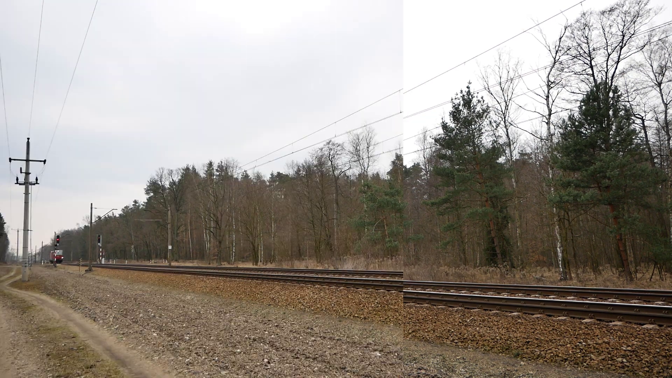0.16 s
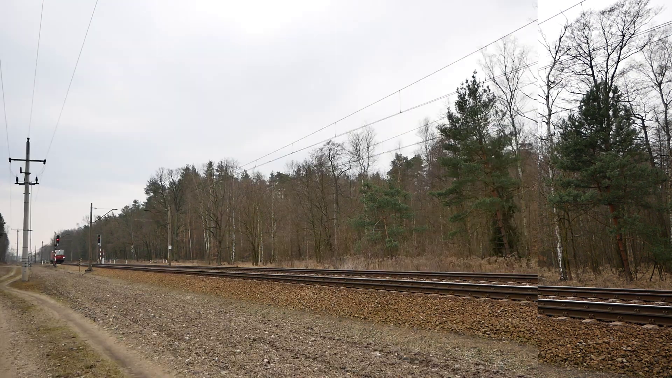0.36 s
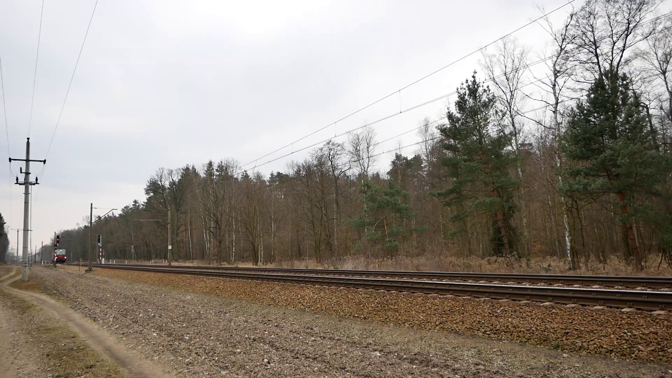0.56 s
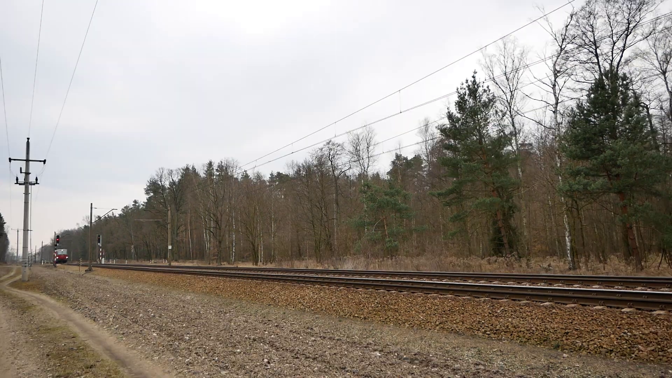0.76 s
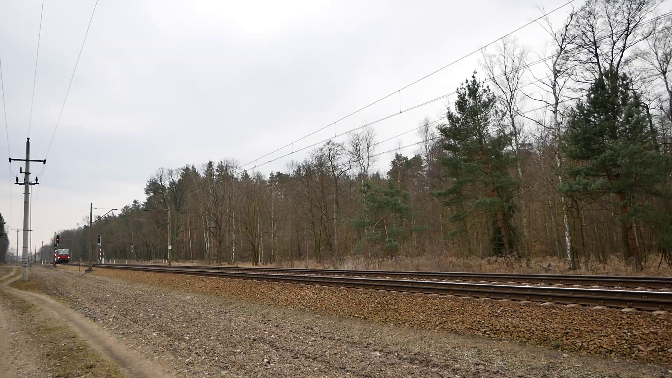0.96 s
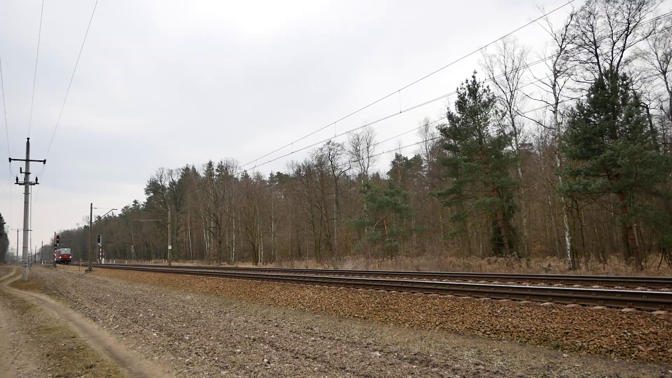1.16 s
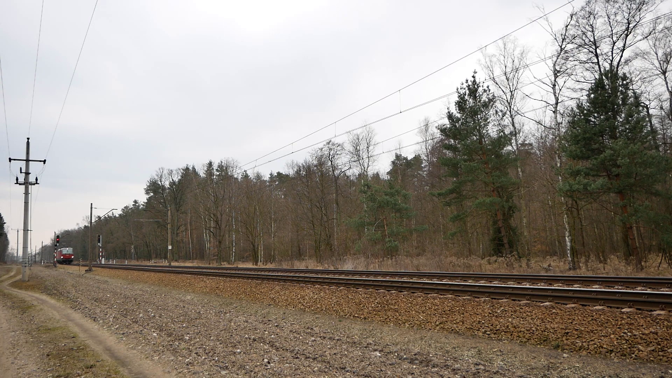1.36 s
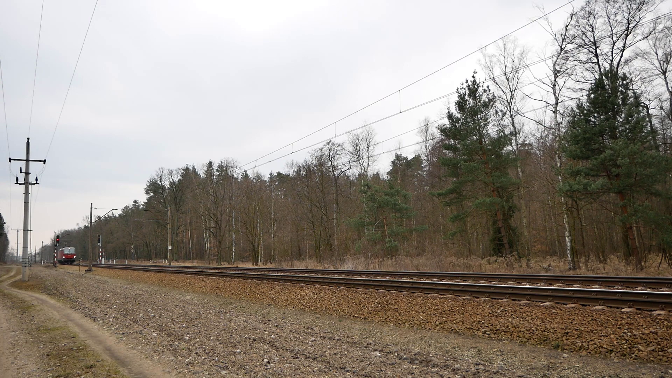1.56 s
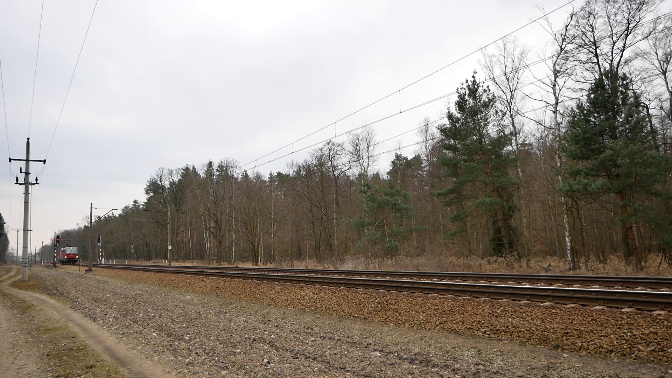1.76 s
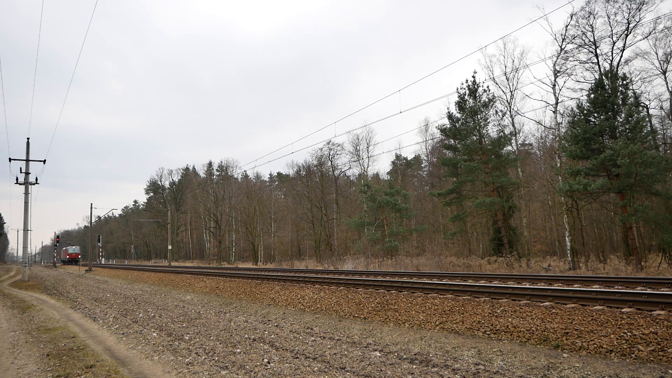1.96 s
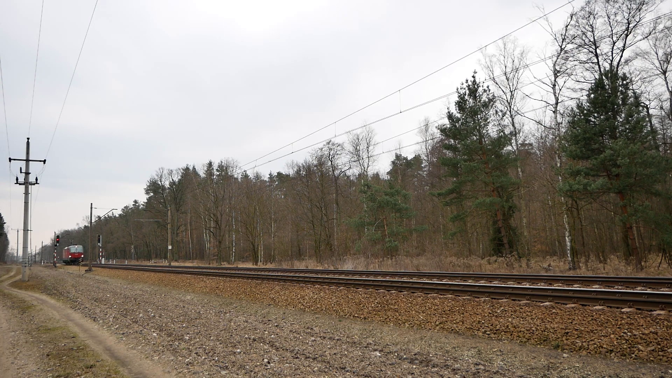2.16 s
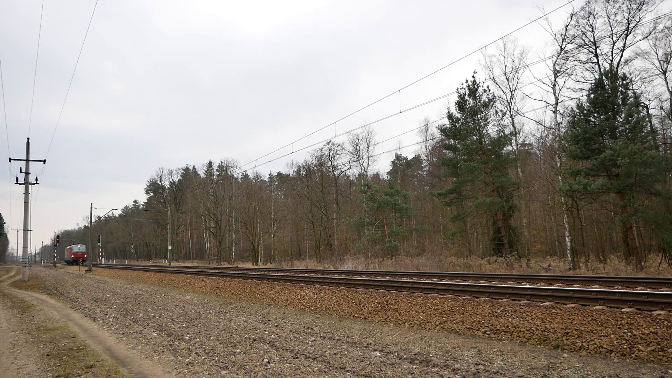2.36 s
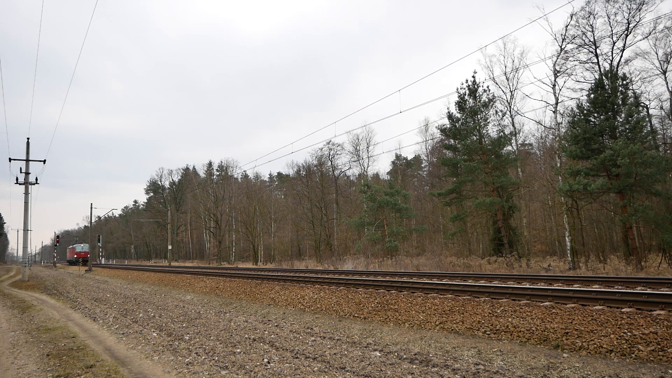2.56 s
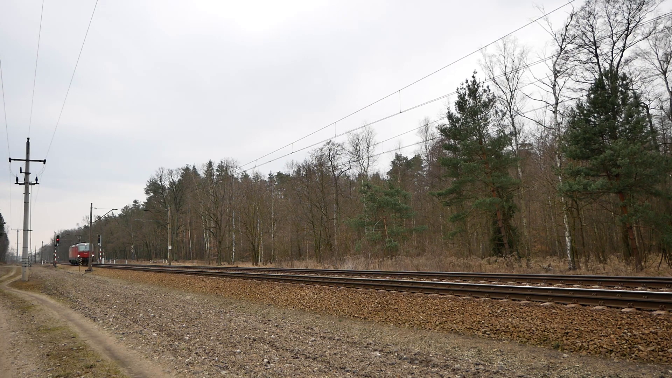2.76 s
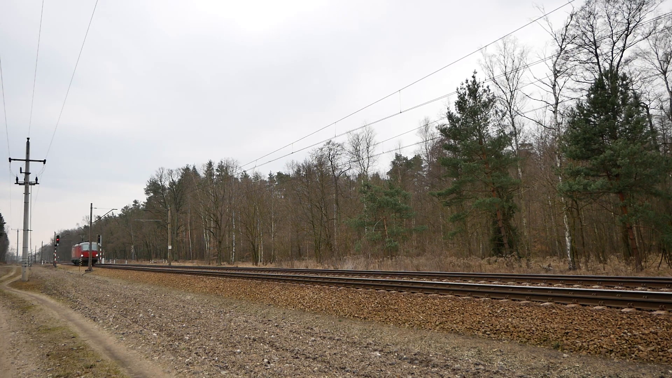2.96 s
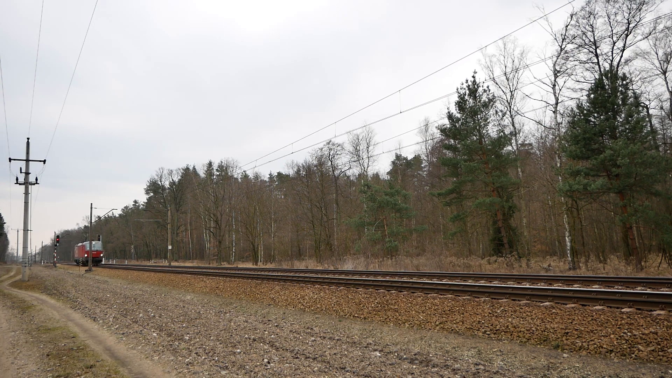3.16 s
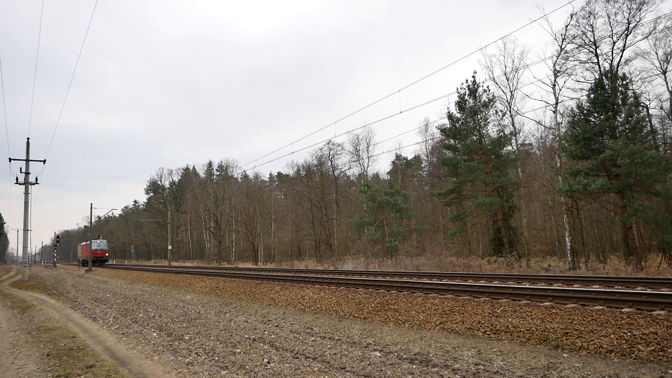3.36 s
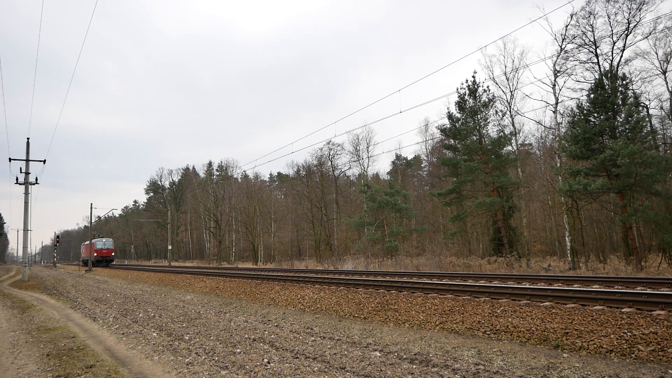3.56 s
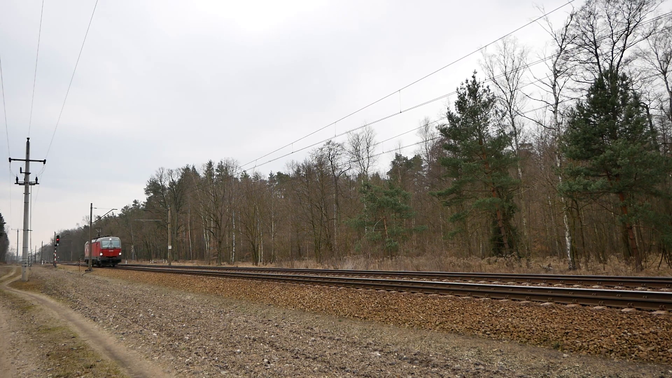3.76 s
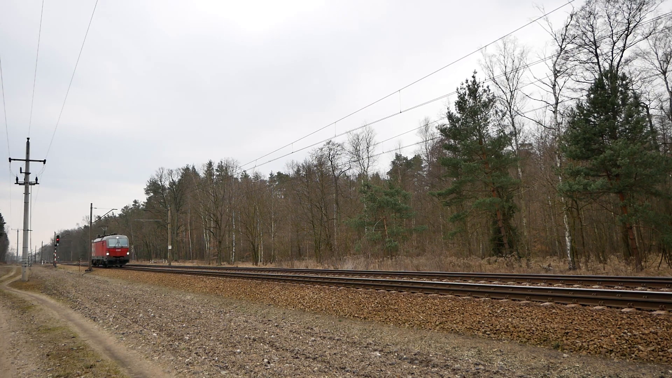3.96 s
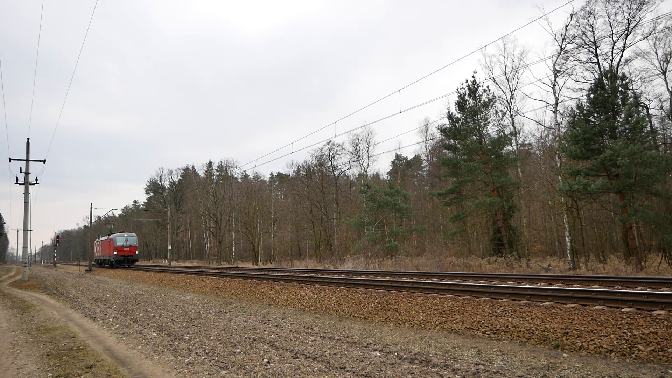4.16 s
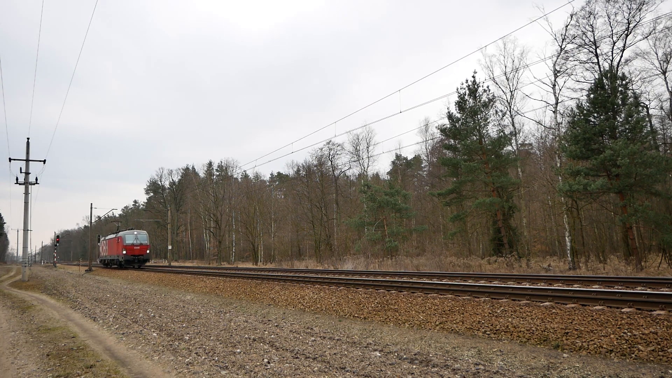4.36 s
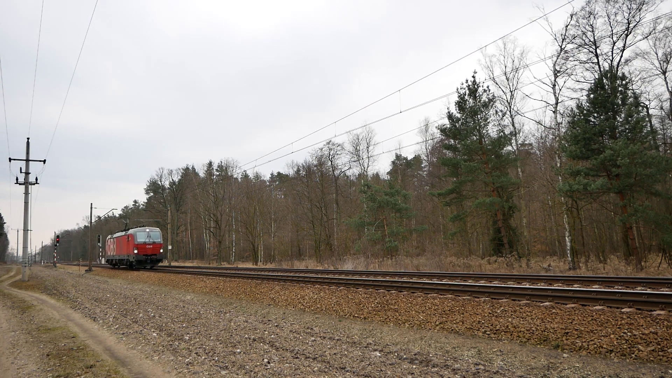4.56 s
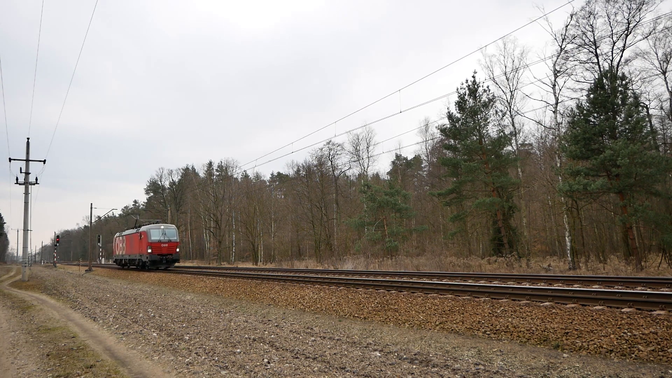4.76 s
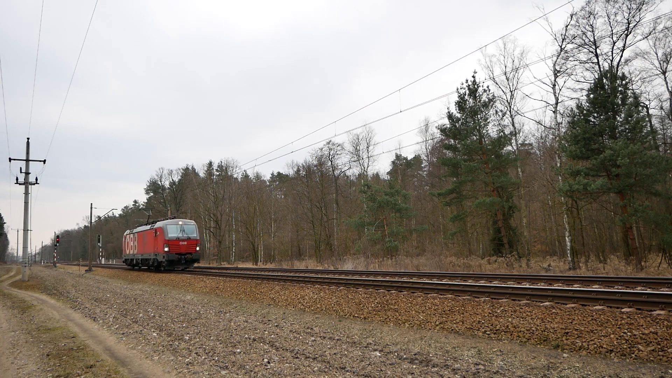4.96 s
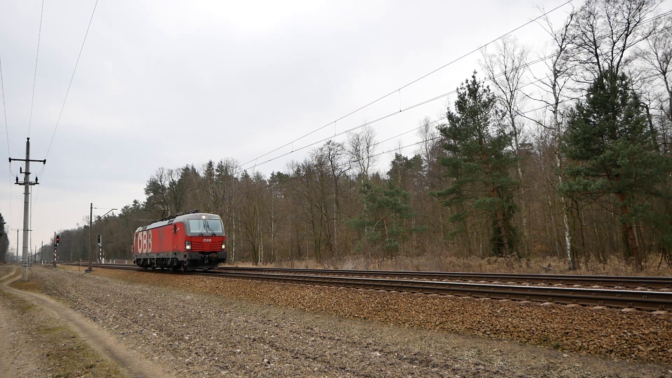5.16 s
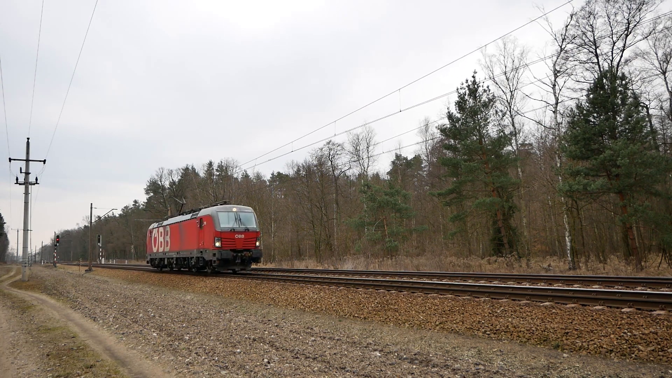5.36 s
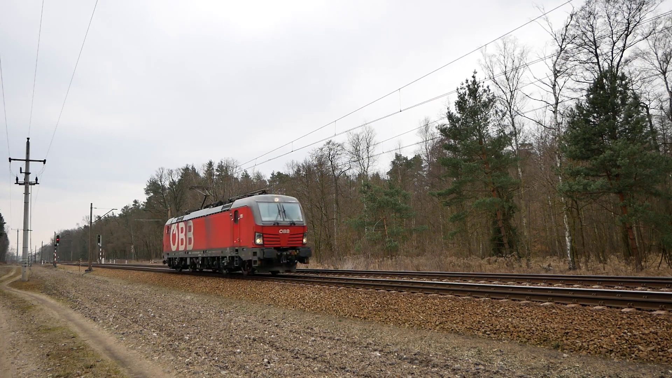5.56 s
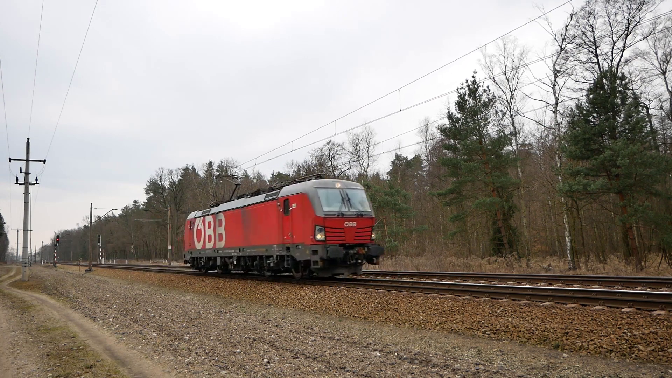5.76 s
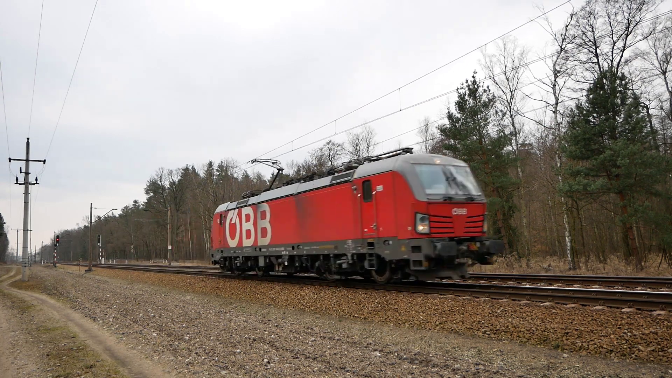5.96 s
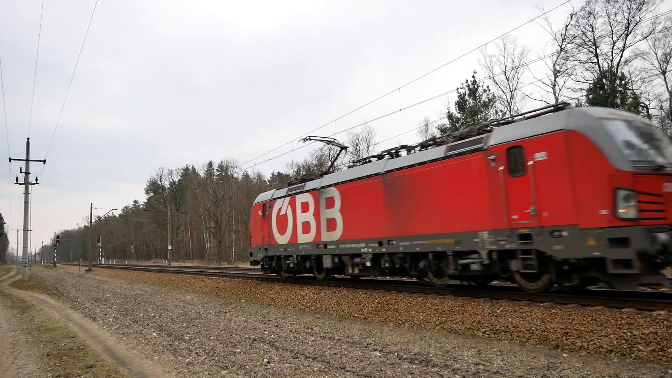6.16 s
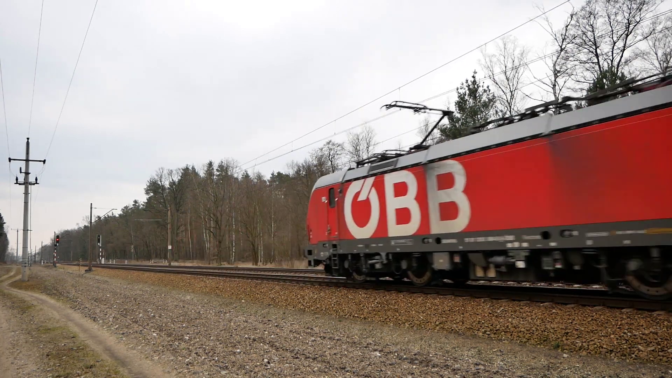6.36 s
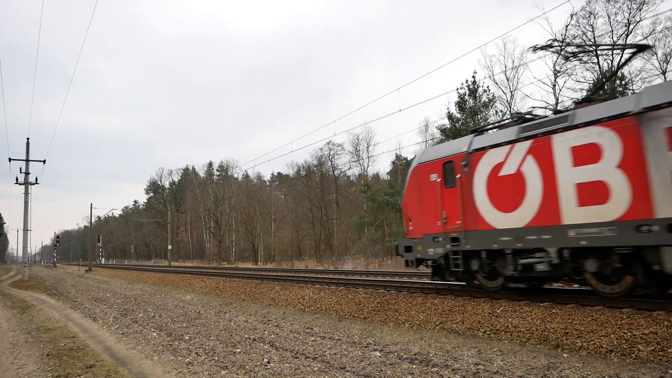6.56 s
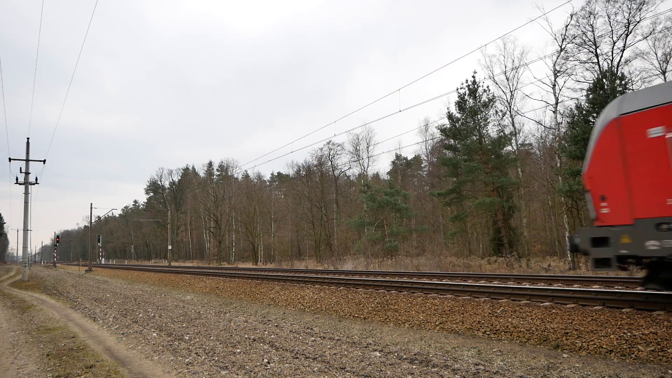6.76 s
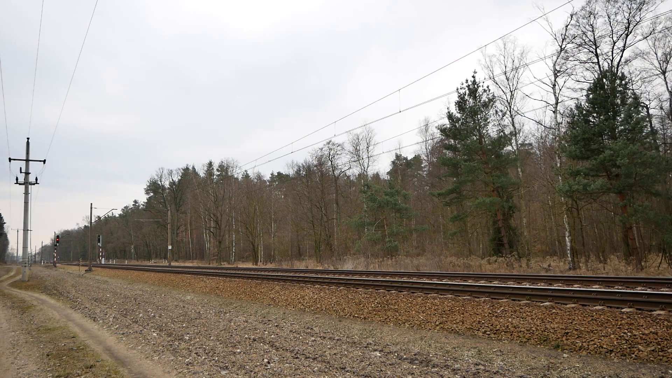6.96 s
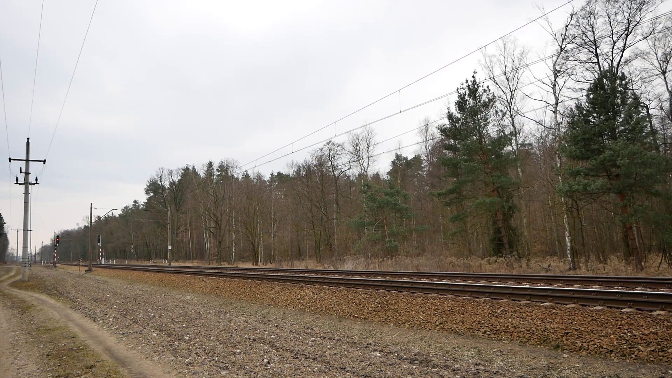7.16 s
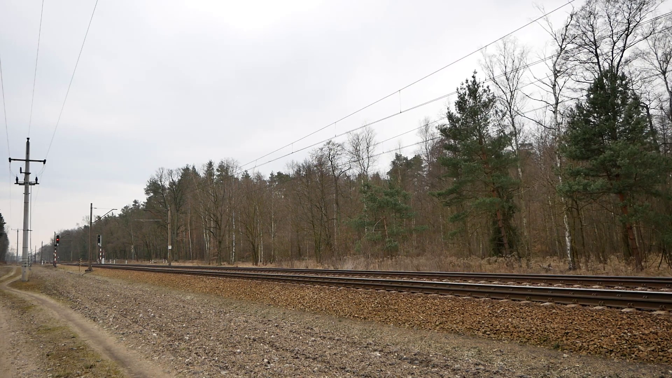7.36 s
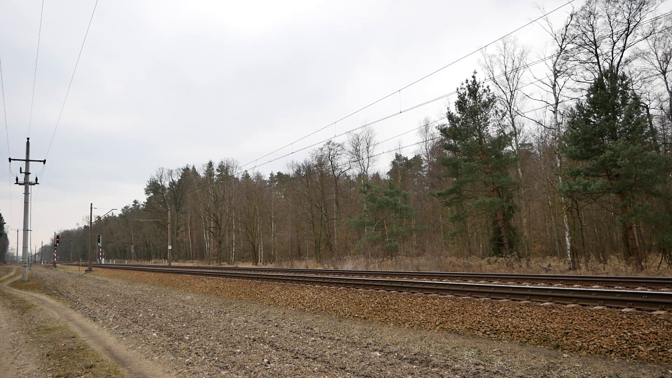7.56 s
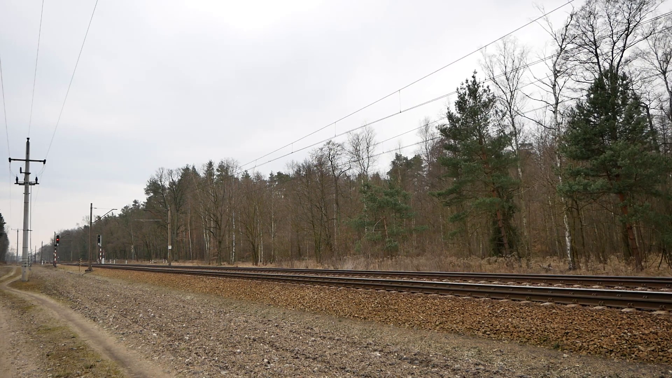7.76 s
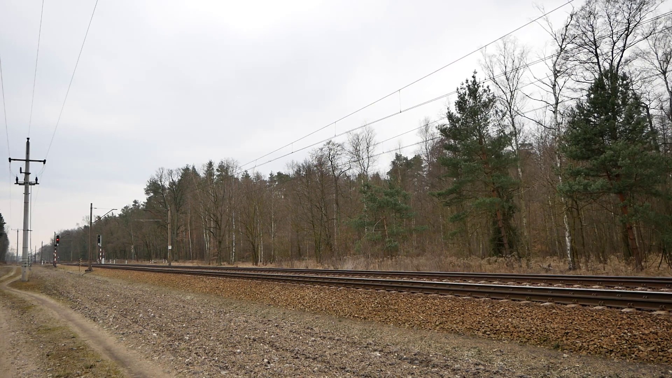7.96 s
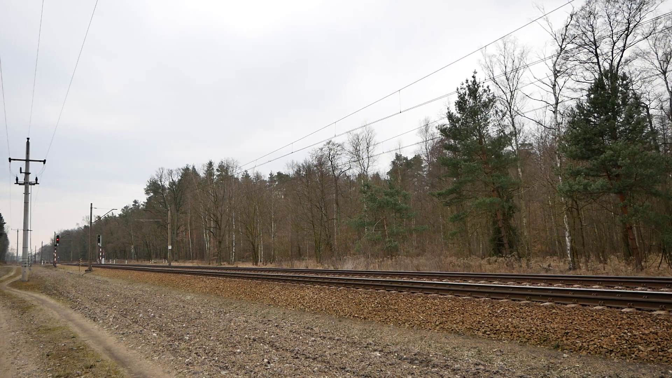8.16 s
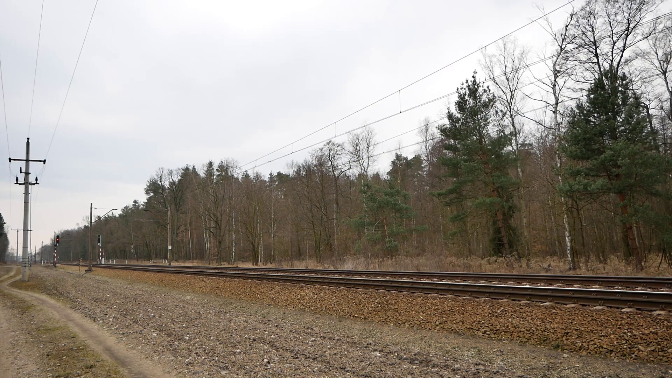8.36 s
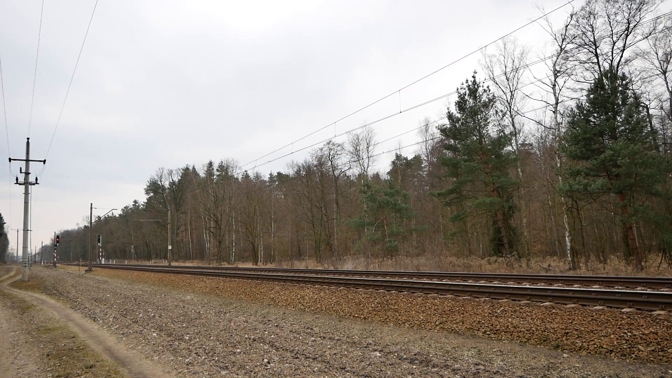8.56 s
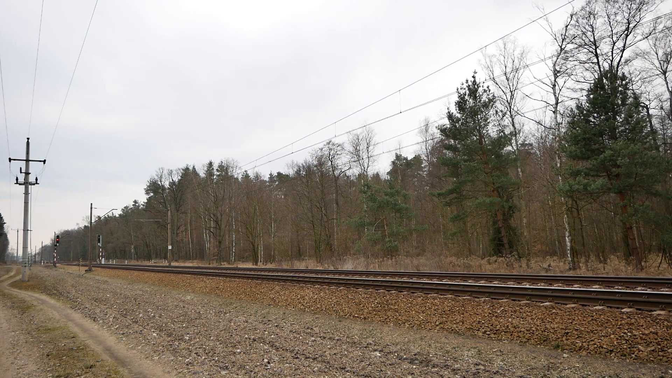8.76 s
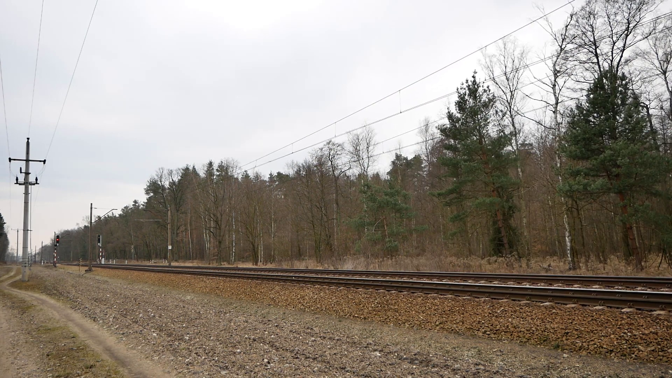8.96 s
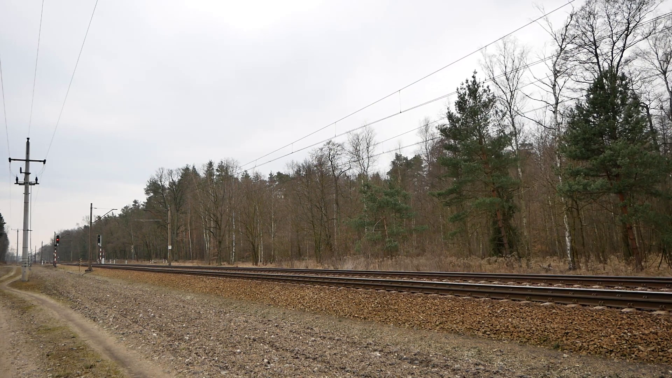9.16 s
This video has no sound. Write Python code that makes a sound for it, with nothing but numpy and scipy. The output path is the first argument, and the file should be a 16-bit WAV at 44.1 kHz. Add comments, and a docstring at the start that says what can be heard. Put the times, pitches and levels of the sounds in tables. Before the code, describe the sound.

A single fast locomotive approaches over hissing, singing rails, sweeps past with a deep roar and rattling wheels, then fades into ringing steel.

```python
"""Beside a forest track, a lone electric locomotive comes fast towards the listener and passes a few metres away.
The rails sing in one narrow band of filtered noise, with a thin sizzle on top and throbs in short bursts.
Coloured noises make the body rumble, the wheels roar and rasp, the air rush by and the bogies clatter.
A wheel squeals briefly in wavering sines; after the pass the overhead wire pings in fading sines and
twangs in falling sweeps."""
import sys
import numpy as np
from scipy import signal
from scipy.fft import rfft, irfft, next_fast_len
from scipy.io import wavfile
from scipy.ndimage import uniform_filter1d, map_coordinates

SR = 44100
rng = np.random.default_rng(int(sys.argv[2]) if len(sys.argv) > 2 else 0)


def persist_wave(psi):
    """Save psi, clipped to +-1, as 16-bit WAV."""
    counts = np.round(np.clip(psi, -1, 1) * 32767).astype(np.int16)
    wavfile.write(sys.argv[1], SR, np.atleast_2d(counts).T)


N = 406602
T = np.arange(N) / SR  # time in s
HZ = np.maximum(np.fft.rfftfreq(next_fast_len(N, True), 1 / SR), 1)  # frequency of each filter step

# wheels rolling on the rails, before trims: t/s, low roar/dB, high rasp/dB
ROLLING_LEVELS = [(0.08, -42, -49.5), (0.15, -37.5, -46), (0.7, -37, -46), (1.8, -43, -45),
                  (2.08, -45, -43), (2.25, -40.5, -40), (2.65, -36.5, -41), (3.15, -39, -40.5),
                  (3.35, -37.5, -37.5), (3.9, -30.5, -35), (4.6, -32, -34.5), (5.4, -26, -31.5),
                  (5.72, -23.5, -29), (5.95, -24.5, -32), (6.3, -21, -30), (6.96, -21, -28.5),
                  (7.08, -23.5, -31), (7.17, -23.5, -30.5), (7.45, -26, -34), (7.75, -36.5, -39.5),
                  (9.22, -36.5, -40.5)]


def undb(db):
    """Turn decibels into a gain."""
    return 10 ** (np.asarray(db) / 20)


def unit(x):
    """Scale to an rms (average strength) of 1."""
    return x / np.sqrt(np.mean(x ** 2))


def curves(table):
    """Join each column of a table by straight lines in time."""
    s, *columns = np.transpose(table)
    return [np.interp(T, s, column) for column in columns]


def colour(x, points):
    """Filter by a spectrum given as points of f/Hz, level/dB."""
    hz, db = np.transpose(points)
    size = next_fast_len(N, True)
    gain = undb(np.interp(np.log(HZ), np.log(hz), db))
    return irfft(rfft(x, size) * gain, size)[:N]


def noise(points):
    """Coloured noise of rms 1."""
    return unit(colour(rng.standard_normal(N), points))


def walk(rate):
    """Random levels, a new one every 1 / rate s, smoothed twice; their spread is near 1."""
    k = max(int(SR / rate), 2)
    steps = np.repeat(rng.standard_normal(N // k + 1), k)
    smooth = uniform_filter1d(uniform_filter1d(steps, k), k)
    return 1.35 * smooth[:N]


def flutter(rate, depth_db):
    """A wavering gain of rms 1."""
    return unit(undb(depth_db * walk(rate)))


def blend(far, near, nearness):
    """Noise whose colour changes as the locomotive comes close."""
    return np.sqrt(1 - nearness) * noise(far) + np.sqrt(nearness) * noise(near)


def add(out, s, sound):
    """Mix a short sound in at time s."""
    i = int(s * SR)
    out[i:i + len(sound)] += sound[:max(N - i, 0)]


def bursts(table, rise):
    """Envelope of bursts that start fast, hold and die; the table gives t/s, level/dB, length/s."""
    out, age = np.zeros(N), T[:SR // 4]
    for s, db, length in table:
        attack = 1 - np.exp(-age / rise)
        decay = np.exp(-(age / length) ** 2 / 2)
        add(out, s, undb(db) * attack * decay)
    return out


def dips(table, rise):
    """A gain of 1 that loses a share of itself for short moments."""
    losses = [(s, 20 * np.log10(lost), length) for s, lost, length in table]
    return 1 - bursts(losses, rise)


def above(x, edge_hz, order=10):
    """Steep high-pass with a moving edge."""
    hz, s, z = signal.stft(x, SR, nperseg=2 ** 10)
    ratio = (hz[:, None] / np.interp(s, T, edge_hz)) ** order
    passed = z * ratio / np.sqrt(1 + ratio ** 2)
    return signal.istft(passed, SR, nperseg=2 ** 10)[1][:N]


def even(x):
    """Noise of rms 1 that keeps its grain but loses its slow chance swells."""
    size = SR // 25
    return x / np.sqrt(uniform_filter1d(x ** 2, size))


def resonance(hz, band=((8, 4), (25, -9), (80, -32), (400, -70))):
    """Noise around a steady or moving centre; the band lists distance from the centre/Hz, level/dB."""
    phase = 2 * np.pi * np.cumsum(hz + np.zeros(N)) / SR
    return (noise(band) * np.cos(phase) + noise(band) * np.sin(phase)) / np.sqrt(2)


def doppler(x, closest_s, sweep_s, mach):
    """Raise the pitch on the way in and lower it on the way out, by playing faster, then slower."""
    along = (T - closest_s) / sweep_s
    speed = 1 / (1 + mach * along / np.sqrt(1 + along ** 2))
    return map_coordinates(x, [np.cumsum(speed)], order=3, mode="wrap")


def rail_song(nearness):
    """Wheels strike the rough rail head unevenly; the rail passes one band of bending waves, with strands."""
    # singing of the rails, before trims: t/s, level/dB
    song_levels = [(0.0, -34.5), (1.72, -34.5), (1.82, -24.5), (2.49, -24), (2.9, -26), (3.29, -17),
                   (3.5, -18.5), (3.8, -19), (3.98, -17), (4.88, -19), (5.3, -18.5), (5.8, -22),
                   (6.15, -22.5), (6.65, -24.5), (7.15, -32.5), (7.45, -33), (7.58, -29), (7.63, -37),
                   (7.83, -28.5), (7.98, -30.5), (8.48, -26.5), (8.65, -27), (8.81, -25), (9.01, -33.5),
                   (9.22, -26.5)]
    # the rails carry their lower notes only a short way: t/s, lower edge of the song/Hz
    song_edge = [(0, 967), (1.8, 1110), (3.5, 1060), (4.3, 940), (5.2, 780), (6, 710), (7, 721), (7.7, 686),
                 (8.4, 816), (9.2, 910)]
    # spectrum of the song: f/Hz, level per Hz/dB
    song_colour = [(400, -21), (700, 5.5), (760, 1.5), (830, 8), (900, 2), (980, 9.5), (1075, 3.5),
                   (1170, 3.5), (1270, 3), (1330, 3), (1405, 3), (1450, -17), (1520, -19), (2000, -62)]
    # bursts in the rails: t/s, level/dB, length/s
    throbs = [(1.776, -16, 0.0085), (1.819, -15, 0.01), (1.924, -14, 0.0078), (1.968, -22, .01),
              (1.998, -13, .007), (2.015, -15, 0.013), (2.057, -15, 0.041), (2.116, -18, .011),
              (2.16, -19.5, 0.03), (2.321, -17.5, 0.018), (2.373, -12, 0.012), (2.432, -15, 0.024),
              (3.4, -10.5, .02), (3.598, -9, 0.0087), (3.631, -10.5, 0.014), (3.678, -11.5, .025),
              (4.06, -16, .02), (4.124, -10.5, 0.011), (4.222, -19, 0.011), (4.275, -12, 0.022),
              (4.465, -16, .02), (4.83, -14, .025), (4.99, -16, 0.028), (5.138, -12, .012),
              (7.535, -17, 0.0069), (7.552, -11.5, 0.011), (7.574, -16.5, .013), (7.708, -18.5, 0.02),
              (7.804, -17.5, 0.017), (7.89, -21, .014), (8.189, -11.5, 0.0092), (8.212, -24, 0.0083),
              (8.364, -18, 0.0093), (8.397, -20, 0.021), (8.44, -20, 0.011), (8.474, -16.5, 0.023),
              (8.708, -18, 0.022), (8.755, -20.5, .014), (8.81, -13.5, 0.0097)]
    # the song drops away for a moment: t/s, share lost, length/s
    lulls = [(1.787, .75, .008), (1.805, .7, .007), (2.03, .65, .016), (2.135, .7, .014), (2.3, .4, .012),
             (2.352, .65, .011), (3.042, .6, .015), (3.162, .6, .018), (3.718, .55, .009),
             (3.882, .7, .016), (4.355, .65, .022)]
    # narrow strands that stand out of the song: f/Hz, relative level/dB
    strand_notes = [(955, -2.5), (1004, -3), (1075, 1.5), (1135, -1.5), (1205, -4.5), (1275, -9.5),
                    (1375, -8)]
    # the strands sharpen as the locomotive nears: t/s, level against the steady song/dB
    strand_levels = [(1.2, -16), (2.5, -7), (4, -5.5), (9.22, -7)]

    song_db, = curves(song_levels)
    edge_hz, = curves(song_edge)
    strand_db, = curves(strand_levels)
    # close by, many waves overlap and even out
    uneven_db = np.interp(T, [3, 4.5, 7.2, 7.6], [1.4, .75, .64, .9])
    contact = rng.standard_normal(N) * flutter(rate=190, depth_db=uneven_db)

    trim_db = 3 * (1 - nearness) + 1.5 * nearness - 1.17  # far off, then close by
    steady = undb(song_db + trim_db) * flutter(rate=20, depth_db=0.5)
    steady = steady * dips(lulls, rise=0.0028)
    drive = np.hypot(steady, bursts(throbs, rise=0.0019))

    strands = np.zeros(N)
    for hz, db in strand_notes:
        strand = resonance(hz * (1 + .005 * walk(5)))
        strands += undb(db) * strand * flutter(rate=14, depth_db=4)  # they come forward in turn
    broad_song = even(colour(contact, song_colour)) * drive
    return above(broad_song + undb(strand_db) * unit(strands) * steady, edge_hz)


def rail_sizzle():
    """High guided waves in the steel: steady in narrow bands, broader in spurts."""
    # treble waves running along the rails: t/s, level/dB
    sizzle_levels = [(0, -52), (.15, -65.5), (1.4, -64), (1.9, -55.5), (2.8, -56.5), (3.4, -50),
                     (4.2, -50.5), (5, -57), (6, -75), (7.7, -56), (7.95, -50), (8.55, -51), (8.8, -45),
                     (9, -47), (9.22, -43.5)]
    # spectra of the sizzle and of its spurts: f/Hz, level per Hz/dB
    sizzle_colour = [(5500, -13), (6800, -12.5), (7150, -0.5), (7500, -3.5), (7950, -29), (9200, -15),
                     (9550, -7.5), (9950, -17), (11200, -12), (12300, -16), (13400, -9), (15400, -37)]
    spurt_colour = [(3000, -12), (5500, -7), (7300, 0), (8100, -10), (9500, -6), (12000, -7), (13500, -13),
                    (15400, -30)]
    # sizzling spurts in the rails: t/s, level/dB, length/s
    spurts = [(6.96, -45, 0.041), (8.073, -38, 0.0093), (8.785, -38, 0.021), (8.895, -38.5, 0.019),
              (9.115, -38, 0.035)]

    sizzle_db, = curves(sizzle_levels)
    steady = undb(sizzle_db) * flutter(rate=81, depth_db=1.5)
    return noise(sizzle_colour) * steady + noise(spurt_colour) * bursts(spurts, rise=0.0033)


def locomotive(nearness):
    """Body rumble, wheel roar, the rasp of steel on steel and rushing air, each a coloured noise."""
    # rumble of the body: t/s, level/dB
    rumble_levels = [(0.0, -37), (0.07, -67), (0.13, -34.5), (0.65, -33.5), (1.46, -43), (2.02, -45),
                     (2.15, -31.5), (2.27, -28), (2.45, -37.5), (2.6, -30.5), (2.8, -39), (3.16, -41),
                     (3.36, -25), (3.44, -25), (3.73, -28.5), (3.77, -23), (3.95, -23), (5.2, -20.5),
                     (5.7, -19.5), (6.2, -20.5), (6.4, -20), (6.91, -17), (7.12, -27), (7.37, -27.5),
                     (7.65, -44.5), (9.22, -46)]
    # rushing air: t/s, level/dB
    hiss_levels = [(0, -67.5), (1.4, -61.5), (2.3, -59), (3.1, -55), (3.9, -47), (4.6, -47), (5.4, -45),
                   (5.75, -42.5), (6.15, -43.5), (6.35, -39), (6.6, -40.5), (6.95, -41), (7.15, -44),
                   (7.45, -44.5), (7.72, -50), (8.2, -49), (9.22, -51)]
    # the rasp flares on rough stretches of rail: t/s, level/dB, length/s
    flares = [(4.04, -27.5, 0.062), (4.83, -37, .02), (5.05, -25, 0.048), (5.22, -30, .07),
              (5.62, -34, 0.097)]
    # spectra from very far, far and near: f/Hz, level per Hz/dB
    rumble_distant = [(20, -29), (50, -15), (85, -11), (115, -1), (145, 5), (190, -2.5), (225, -4),
                      (270, -11.5), (380, -41), (700, -68)]
    rumble_far = [(20, -37), (38, -40), (55, -8), (90, -1), (145, 3.5), (200, -3), (260, -9), (320, -8),
                  (390, -23.5), (700, -69)]
    rumble_near = [(20, -43), (38, -49), (55, -16), (90, -8.5), (135, -3.5), (175, 0.5), (250, -0.5),
                   (310, -10), (420, -17), (700, -76)]
    roar_far = [(150, -11.5), (260, -7), (420, -2.5), (520, -0.5), (700, 2), (830, 3), (1000, -6.5),
                (1500, -0.5), (2000, -42)]
    roar_near = [(150, -33), (320, -2.5), (440, -1.5), (515, 1.5), (580, 2.5), (700, 2), (850, -1.5),
                 (1100, -9.5), (1800, -62)]
    rasp_colour = [(900, -9), (1250, 5), (1450, 6), (1650, 3.5), (1850, .8), (2300, -4.3), (3200, -9.3),
                   (3600, -11.5), (4200, -17.5), (6000, -32)]
    hiss_far = [(2500, 6.5), (4000, -9), (5000, 8), (6500, 7), (8300, 1.5), (11000, -28), (14000, -12),
                (15300, -20)]
    hiss_near = [(2500, -23), (4000, 3.5), (5000, 7), (6500, 4), (7500, 4.5), (8800, 2.5), (9900, -6),
                 (11500, -14), (14000, -26), (15300, -32)]

    rumble_db, = curves(rumble_levels)
    roar_db, rasp_db = curves(ROLLING_LEVELS)
    hiss_db, = curves(hiss_levels)
    # the bogies jolt the body and the wheels, harder when close
    jolts = flutter(rate=34, depth_db=.7 * np.sqrt(nearness))

    # from far off only one hollow band of the rumble arrives
    distant = np.interp(T, [2.55, 3.1], [1, 0])
    body = np.sqrt(distant) * noise(rumble_distant)
    body += np.sqrt(1 - distant) * blend(rumble_far, rumble_near, nearness)
    rumble = body * undb(rumble_db)

    roar = blend(roar_far, roar_near, nearness) * undb(roar_db + 3.5 - 3.75 * nearness)

    rasp = doppler(noise(rasp_colour), closest_s=6.4, sweep_s=.4, mach=.09)
    rasp = rasp * np.hypot(undb(rasp_db + 3.5), bursts(flares, rise=0.0084))
    rasp = rasp * flutter(rate=180, depth_db=0.72)

    hiss = blend(hiss_far, hiss_near, nearness) * undb(hiss_db) * flutter(rate=250, depth_db=0.5)
    return jolts * (rumble + roar + rasp + hiss)


def track_ring():
    """Rails and sleepers hum in narrow resonances that follow the level of the wheel roar."""
    # narrow resonances driven by the rolling wheels: f/Hz, level/dB
    track_modes = [(514, 3.5), (690, -16), (1068, -1.5)]

    roar_db = curves(ROLLING_LEVELS)[0]
    share_db = np.interp(T, [5, 6.5, 7.6, 9.22], [-21, -13, -7.5, -8.5])
    hum = sum(undb(db) * resonance(hz) for hz, db in track_modes)
    return hum * undb(roar_db + share_db)


def open_air():
    """A faint deep rumble of steady noise that stays throughout."""
    # spectrum of the deep rumble: f/Hz, level per Hz/dB
    air_colour = [(20, -22), (45, -17), (70, 8), (110, -4), (250, -1), (1000, -70)]
    return noise(air_colour) * undb(-50)


def ballast_ticks():
    """Sparse tiny ticks of fading noise, about 30 a second, a few much louder than the rest."""
    loudness = undb(4.0 * np.minimum(rng.exponential(size=N), 3))
    ticks = (rng.random(N) < 30 / SR) * loudness
    age = T[:SR // 100]
    grain = rng.standard_normal(len(age)) * np.exp(-age / 0.0013)
    ticks = signal.fftconvolve(ticks, grain)[:N]
    tick_sound = colour(ticks, [(2500, -20), (5000, -5), (7500, 5), (10000, -15), (15000, -12)])
    return unit(tick_sound) * undb(-71.0)


def wheel_ring():
    """A rough resonance that stumbles down in pitch as the wheels turn from coming to going."""
    # the wheels ring as they sweep past: t/s, ring before the stumble/Hz, level/dB
    ring_path = [(3.0, 1763, -64), (4.6, 1767, -45), (5.5, 1700, -31), (5.72, 1650, -25), (5.81, 1400, -19),
                 (5.86, 1200, -36), (5.91, 968, -23), (6.1, 900, -28), (6.9, 861, -33), (7.5, 829, -26.5),
                 (7.9, 813, -22.5), (8.3, 820, -44)]

    ring_hz, ring_db = curves(ring_path)
    stumble = 1 + .04 * walk(45)
    ring = resonance(ring_hz * stumble, [(60, -2.5), (130, -2), (400, -19), (1500, -70)])
    return ring * undb(ring_db) * flutter(rate=60, depth_db=2.0)


def roar_sweep():
    """A broad hump of wheel roar that sinks in pitch during the pass and surges as the wheels thud."""
    # the heart of the roar sinks as the locomotive draws level, then partly climbs: t/s, centre/Hz, level/dB
    hump_path = [(4.8, 1156, -45), (5.4, 1062, -26.5), (5.84, 932.5, -26), (6.0, 831, -22),
                 (6.15, 680, -23.5), (6.4, 528.2, -22), (6.5, 580.3, -35), (6.7, 681.7, -23.5),
                 (7.05, 738.4, -37), (7.7, 590, -62)]
    # the wheels thud over the nearby track and the roar surges: t/s, level/dB, length/s
    surges = [(5.888, -13.5, 0.026), (6.105, -15, 0.048), (6.27, -18, 0.034), (6.36, -19, .03),
              (6.595, -21, 0.033), (6.72, -18.5, 0.048), (6.92, -20, 0.045), (7.02, -24, .04),
              (7.07, -17, .02), (7.265, -20.5, 0.028)]

    centre_hz, sweep_db = curves(hump_path)
    hump = even(resonance(centre_hz, [(60, -3.0), (210, -1.0), (380, -8.0), (900, -37), (2000, -70)]))
    return hump * np.hypot(undb(sweep_db), bursts(surges, rise=0.0068))


def wheel_squeal():
    """A flange scrapes the rail and the wheel's modes waver and stutter."""
    # a wheel squeals briefly, before a trim: t/s, level/dB
    squeal_levels = [(5.9, -120), (5.94, -66), (5.965, -47), (6.01, -46), (6.04, -58), (6.08, -53),
                     (6.13, -52), (6.17, -66), (6.22, -120)]
    # the wheel's modes: f before wavering/Hz, relative level/dB
    wheel_modes = [(4479, -5.5), (5254, -2), (6180, -3.5), (8565, -1), (9458, -12), (10234, -17),
                   (11273, -17), (13975, -12)]

    squeal_db, = curves(squeal_levels)
    modes = np.zeros(N)
    for hz, db in wheel_modes:
        wavering_hz = hz * (1 + 0.003 * walk(400))
        tone = np.sin(2 * np.pi * np.cumsum(wavering_hz) / SR)
        modes += undb(db) * tone * flutter(rate=150, depth_db=3)
    return modes * undb(squeal_db + 2)


def bogie_clatter():
    """Each knock is a dull thud, a broad crack and a short metallic rattle around its own pitch."""
    # bogies clatter close by, before trims: t/s, level/dB, length/s, rattle centre f/Hz
    clatter_knocks = [(6.236, -29, .01, 1800), (6.342, -25, .016, 1650), (6.529, -25, .012, 2100),
                      (6.604, -29, .007, 1900), (6.633, -20.5, .01, 2300), (6.66, -30.5, .011, 3300),
                      (6.74, -26.5, .013, 2800), (6.947, -29, .01, 2000), (6.972, -21, .012, 1900),
                      (6.993, -27, .018, 2600), (7.058, -28, .01, 1600), (7.076, -21, .014, 2100),
                      (7.222, -31, .009, 2100), (7.278, -29, .014, 2400), (7.414, -32, .016, 2300)]
    # spectrum of the crack: f/Hz, level per Hz/dB
    crack_colour = [(500, -13), (1000, 5), (1900, 9), (3200, -3), (4000, -10), (8000, -17), (14000, -31)]
    # spectrum of the rattle: distance from its centre/Hz, level per Hz/dB
    rattle_band = [(100, 3), (300, -5), (700, -7), (2000, -45)]

    crack = noise(crack_colour) * flutter(rate=400, depth_db=3)
    thud_colour = [(60, -25), (180, -2), (400, -6), (750, 1), (1100, -5), (1800, -25), (4000, -60)]
    thud = even(noise(thud_colour))
    grain = even(noise(rattle_band))
    rattles = np.zeros(N)
    for s, db, length, hz in clatter_knocks:
        rattles += bursts([(s, db, length)], rise=0.002) * np.sin(2 * np.pi * hz * T)
    knocks = bursts([row[:3] for row in clatter_knocks], rise=.002)
    return (undb(-.5) * crack + undb(4) * thud) * knocks + undb(-2.5) * rattles * grain


def trailing_drone():
    """A low drone of narrow noise that swells as the locomotive leaves, then fades unevenly."""
    # low drone that trails the locomotive, before a trim: t/s, level/dB
    drone_levels = [(6.8, -57), (7.2, -26), (7.4, -29.5), (7.6, -37), (7.8, -44), (8.05, -35.5), (8.2, -55),
                    (9.22, -62)]

    drone_db, = curves(drone_levels)
    drone = noise([(30, -32), (70, -18), (105, 13.5), (145, 6), (190, -3), (500, -54)])
    return drone * undb(drone_db - 3.5)


def wire_pings():
    """The swinging wire knocks in its fittings and bounces once; each knock rings the same modes."""
    # pings of the overhead wire, before a trim: t/s, level/dB, pitch ratio
    ping_times = [(8.077, -31, 1.01), (8.358, -41, 1.03), (8.698, -35, 1.015), (8.803, -39, 1.012)]
    # modes of the wire: f before the pitch ratio/Hz, relative level/dB, time to fade by 60 dB/s
    wire_modes = [(2730, -5.5, 0.069), (3486, 0, 0.047), (5500, -9, 0.037), (7370, -6, 0.037),
                  (8419, -20, .06), (9469, -17, .06), (11320, -21, .06), (14070, -20, .03)]

    out, age = np.zeros(N), T[:SR // 4]
    for s, level_db, pitch in ping_times:
        ring = np.zeros(len(age))
        for hz, db, t60 in wire_modes:
            ring += undb(db - 60 * age / t60) * np.sin(2 * np.pi * hz * pitch * age)
        ring = ring * (1 - np.exp(-age / 0.00091)) * undb(level_db + 3.5)
        add(out, s, ring)
        add(out, s + rng.uniform(0.015, 0.016), 0.44 * ring)  # the bounce
    return out


def wire_twangs():
    """High notes run faster along the taut wire, so nearly every twang arrives as a rough falling sweep."""
    # twangs along the wire, before trim and roughness: t/s, level/dB, start f/Hz, end f/Hz, length/s
    twang_sweeps = [(8.118, -43, 3000, 2250, .042), (8.14, -44, 2100, 1800, .035),
                    (8.182, -46, 2900, 2200, .026), (8.198, -42, 1850, 1600, .045),
                    (8.205, -48, 2500, 2300, .02), (8.252, -45, 2200, 2320, .033),
                    (8.335, -46, 1900, 1700, .03), (8.44, -44.5, 2550, 2300, .05),
                    (8.452, -49, 3200, 3000, .035), (8.548, -44, 2350, 1950, .05)]

    out, waver, grain = np.zeros(N), walk(900), walk(500)
    for s, db, start_hz, end_hz, length in twang_sweeps:
        i, size = int(s * SR), int(length * SR)
        roughness = 1 + .1 * waver[i:i + size]
        hz = np.geomspace(start_hz, end_hz, size) * roughness
        tone = np.sin(2 * np.pi * np.cumsum(hz) / SR)
        add(out, s, undb(db + 6.5) * np.hanning(size) * tone)
    return out * grain


def scene():
    """All sources lie along one track in the middle; mainly the treble spreads a little to left and right."""
    # the roar sags for a moment: t/s, share lost, length/s
    sags = [(5.83, .35, .035), (6.465, .35, .035), (6.885, .35, .025), (7.345, .3, .035)]

    # nearness is 1 at the closest moment and one half near_s before and after it
    closest_s, near_s = 6.46, 1.47
    nearness = 1 / (1 + ((T - closest_s) / near_s) ** 4)

    track = rail_song(nearness) + track_ring() + rail_sizzle() + ballast_ticks()
    wire = wire_pings() + wire_twangs()
    passing = (locomotive(nearness) + roar_sweep()) * dips(sags, rise=0.013)
    wheels = bogie_clatter() + wheel_ring() + wheel_squeal()
    mid = track + wire + passing + wheels + trailing_drone() + open_air()

    # a faint noise-smeared copy of the middle, mostly treble, with opposite sign left and right
    age = T[:SR // 4]
    smear = rng.standard_normal(len(age)) * age * np.exp(-age / 0.026)
    side = signal.fftconvolve(mid, smear / np.linalg.norm(smear))[:N]
    side = colour(side, [(25, -12), (70, -37), (150, -49), (330, -36.5), (600, -43), (1300, -47),
                         (2000, -22), (4000, -18.5), (12000, -15.5)])
    return np.array([mid + side, mid - side])


def record(dry):
    """Cut the treble steeply above 15000 Hz."""
    low_pass = signal.ellip(8, .2, 70, 15000, fs=SR, output="sos")
    return signal.sosfilt(low_pass, dry)


dry = scene()
out = record(dry)
persist_wave(out)
```